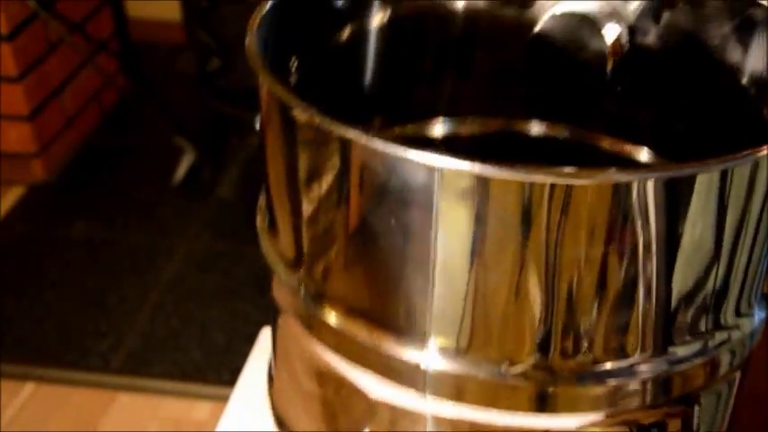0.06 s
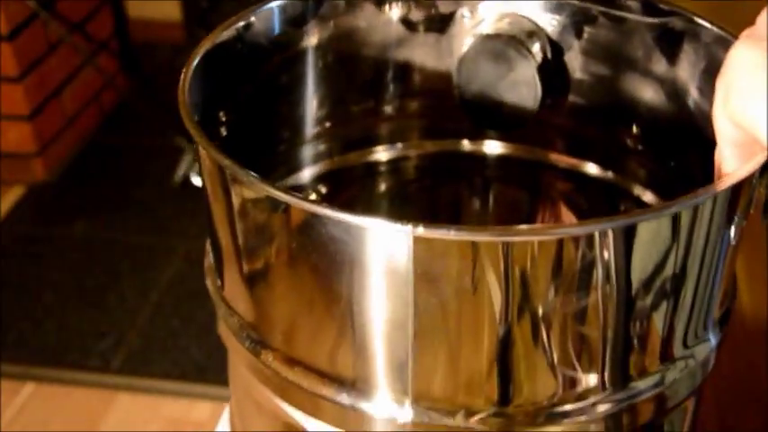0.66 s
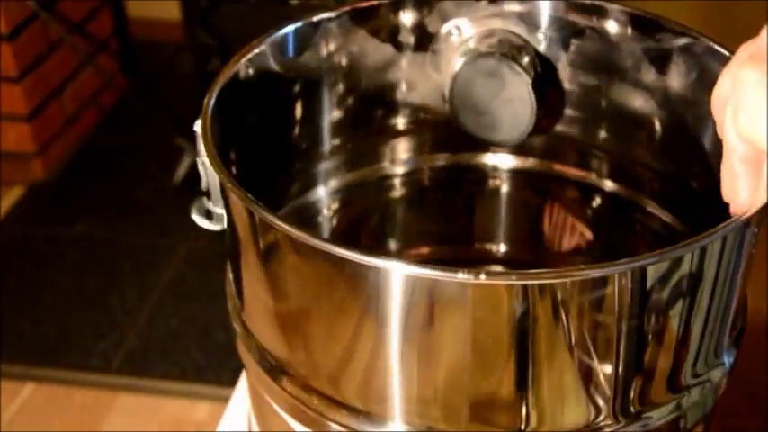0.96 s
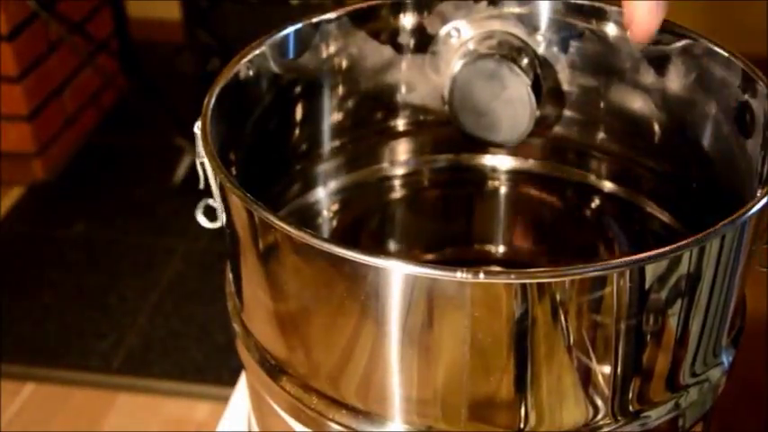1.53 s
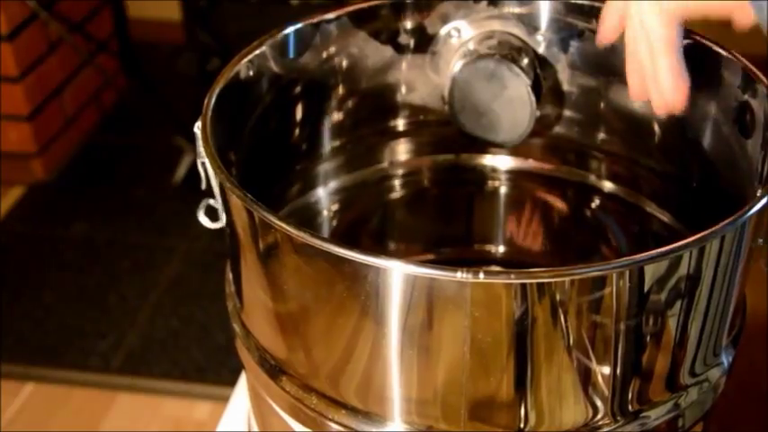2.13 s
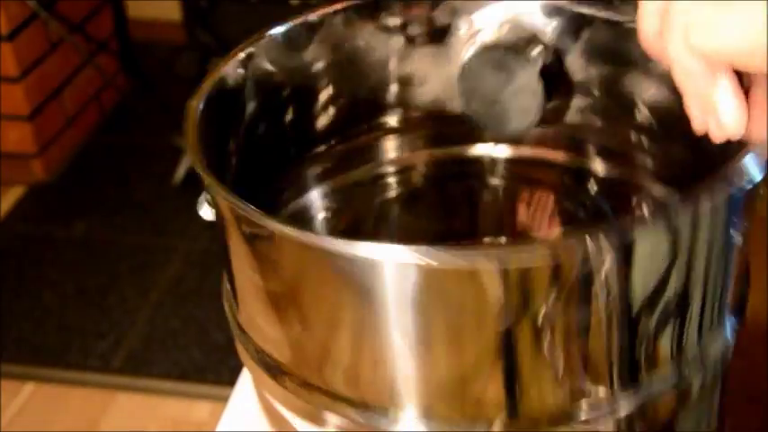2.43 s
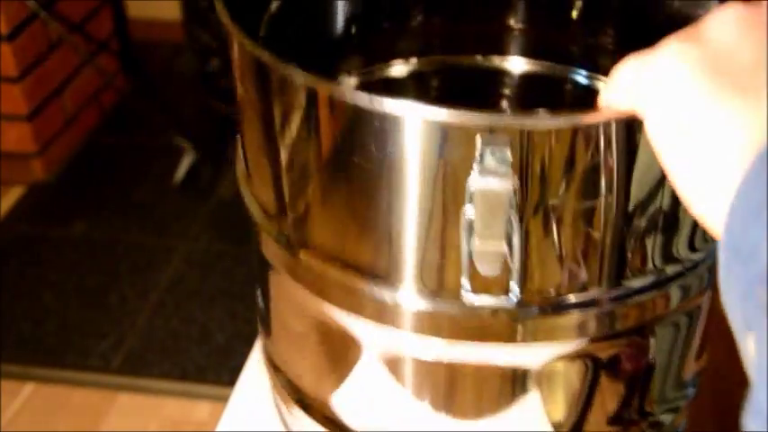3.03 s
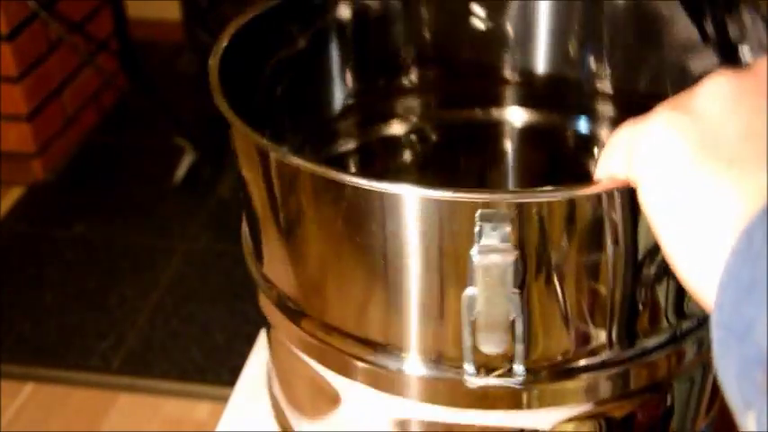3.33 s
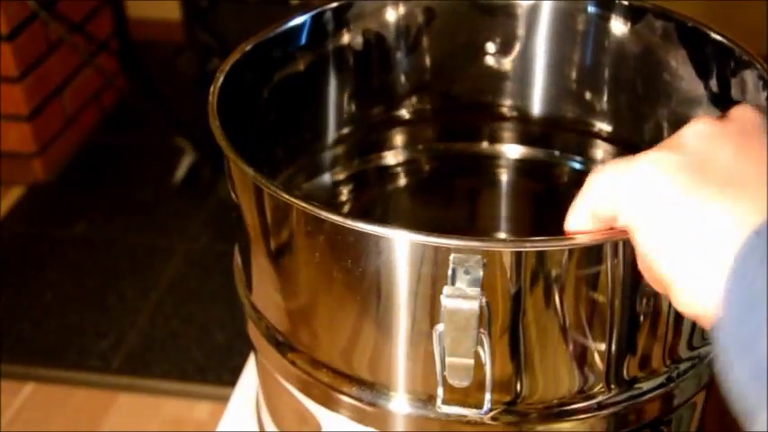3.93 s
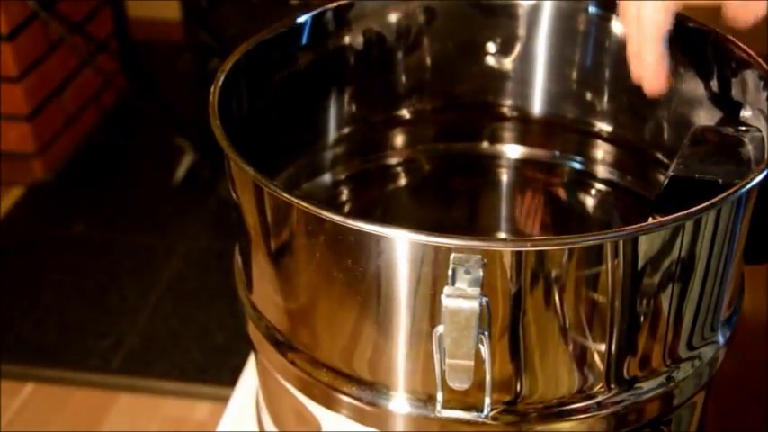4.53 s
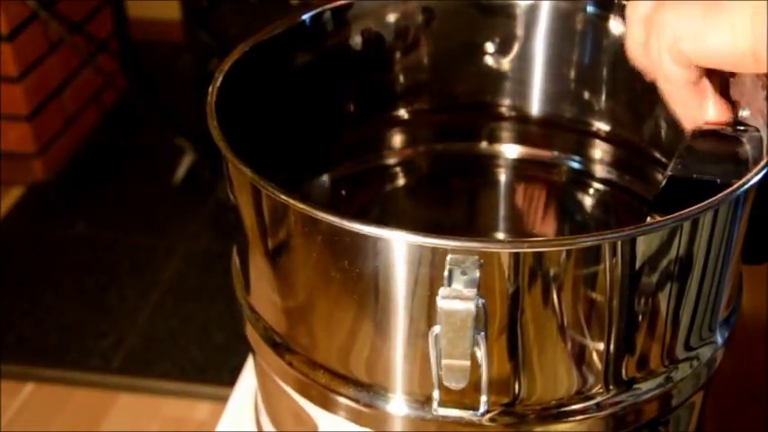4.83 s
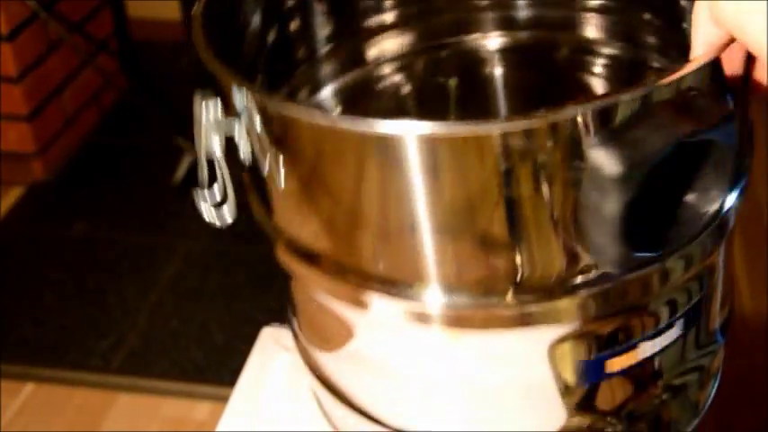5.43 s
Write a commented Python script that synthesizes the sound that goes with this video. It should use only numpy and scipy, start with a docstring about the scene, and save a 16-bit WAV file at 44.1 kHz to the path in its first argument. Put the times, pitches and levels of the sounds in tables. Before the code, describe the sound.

An empty stainless steel tank is handled close by in a quiet room with a short echo. It opens with a few light, ringing latch knocks on the thin wall and a sharper one at 0.7 seconds. From 0.9 to 1.3 seconds the tank lands with a hollow boom, a scrape and a dense clatter, leaving a faint hum. A lull follows, with a tap near 1.8 seconds and a hand sliding softly over steel. From 2.4 seconds the tank drags and the latches clank again, strongest near 3 seconds, where the wall briefly moans. A high clink and a soft thud come at 3.5 seconds, then another knock and weaker taps as the tank rocks until about 4.2. After a pause and another faint hand slide, a loud ringing clank just after 5 seconds starts a last scrape and latch chatter, lasting until about 5.6.

```python
"""An empty stainless steel tank is tipped, set down and turned by its rim in a quiet living room.
From the start it drags, its bottom drums, and loose latches knock on the thin wall, which rings.
Soon the rim sings and the bottom booms at a knock or a landing; after a second the tilted tank hums.
Then a hand slides over the steel. From about 2.5 s a latch's wire loop clinks and the rocking tank
moans now and then. Near the end the hand slides again, and a last move sets the latches chattering."""
import sys
import numpy as np
from scipy import signal
from scipy.fft import rfft, irfft
from scipy.io import wavfile
from scipy.ndimage import uniform_filter1d

SR = 44100
rng = np.random.default_rng(int(sys.argv[2]) if len(sys.argv) > 2 else 0)


def store_pcm(level_fs):
    """Save levels as 16-bit WAV."""
    pcm = np.round(np.clip(level_fs, -1, 1) * 32767).astype(np.int16)
    wavfile.write(sys.argv[1], SR, np.atleast_2d(pcm).T)


N = 250929
RING_TIME = np.arange(SR) / SR  # one second: the time axis of one ring

# how strongly the wall rings, from low to high: (frequency [Hz], level [dB])
WALL_SPECTRUM = [(60, -29), (250, -27.5), (650, -8), (900, -11.5), (1130, 1.5), (1420, -4.5), (1640, 4.5),
                 (1880, 2), (2350, -4), (3050, 0), (3480, -1), (4350, 0), (6900, -6.5), (7900, -14),
                 (9300, -6.5), (11500, -28)]
# each move of the tank: (start [s], length [s], drag level [dB], drumming level [dB])
MOVES = [(0, 0.014, -50, -54.5), (0.198, 0.14, -54, -72), (0.942, 0.3, -34.5, -59),
         (2.367, 0.15, -40, -55.5), (2.686, 0.069, -34.5, -58.5), (3.014, 0.22, -43, -63),
         (3.668, 0.54, -65, -64.5), (4.95, 0.23, -46.5, -59), (5.24, 0.48, -43.5, -63)]


def amp(db):
    """Turns decibels into a factor to multiply by."""
    return 10 ** (np.asarray(db) / 20)


def unit(x):
    """Scales a signal to an average size (rms) of 1."""
    return x / np.sqrt(np.mean(x ** 2) + 1e-20)


def read(points, hz):
    """Looks up a value between rows of (frequency [Hz], value), on a log-frequency axis."""
    f, value = np.transpose(points)
    return np.interp(np.log(hz + 1), np.log(f + 1), value)


def level(events, rise_s, sag_db_per_s, release_s):
    """Volume curve from (start [s], length [s], level [dB]): each event rises, drifts, then dies away."""
    power = np.zeros(N)
    for start, length, db in events:
        t = np.maximum(np.arange(N) / SR - start, 0)
        held = np.minimum(t / rise_s, 1) * amp(db - sag_db_per_s * np.minimum(t, length))
        power += (held * np.exp(-np.maximum(t - length, 0) / release_s)) ** 2
    return np.sqrt(power)


def add(mix, s, sound):
    """Mixes a sound in at s seconds."""
    part = mix[max(round(s * SR), 0):][:len(sound)]
    part += sound[:len(part)]


def waver(size):
    """A random wobble, smoothed over size samples."""
    return unit(uniform_filter1d(uniform_filter1d(rng.standard_normal(N), size), size))


def noise(spectrum, size):
    """Noise shaped by rows of (frequency [Hz], level [dB])."""
    gain = amp(read(spectrum, np.fft.rfftfreq(size, 1 / SR)))
    return unit(irfft(rfft(rng.standard_normal(size)) * gain, size))


def fading(spectrum, t60):
    """Noise whose bands each have their own fade time (t60: the time to fall by 60 dB)."""
    hz, t, bands = signal.stft(noise(spectrum, SR), SR, nperseg=256)
    fade = np.exp(-np.log(1000) * t / read(t60, hz)[:, None])
    return signal.istft(bands * fade, SR, nperseg=256)[1][:SR]


def resonate(x, hz, width_hz):
    """Keeps a narrow band of a sound, so that it rings."""
    return unit(signal.lfilter(*signal.iirpeak(hz, hz / width_hz, fs=SR), x))


def tones(modes, waver_hz, waver_db, size):
    """Held modes (an object's natural tones); each wobbles in level and pitch on its own."""
    out = np.zeros(N)
    for hz, db in modes:
        gain = amp(db + waver_db * waver(size))
        out += gain * np.sin(2 * np.pi * np.cumsum(hz + waver_hz * waver(size)) / SR)
    return out


def rings(modes, count, spread_db):
    """Rings of one object struck at count spots; each spot mixes the modes differently."""
    hz, db, t60 = np.transpose(modes).astype(np.float32)[:, :, None]
    t = RING_TIME.astype(np.float32)
    waves = np.sin(np.float32(2 * np.pi) * hz * t) * np.exp(np.float32(-np.log(1000)) * t / t60)
    size, sign = rng.standard_normal((count, 2, len(hz))).transpose(1, 0, 2)
    weight = amp(db.T + spread_db * np.clip(size, -2, 2)) * np.sign(sign)
    weight /= np.sqrt((weight ** 2).sum(1, keepdims=True) / 2)
    return weight.astype(np.float32) @ waves


def spot_colour(uneven_db=7.0, even_hz=6500):
    """The spectrum of one spot on the wall: it favours some groups of modes, less so in the treble."""
    hz = np.arange(60, 12000, 110)
    chance = np.clip(rng.standard_normal(len(hz)), -2, 2)
    favour_db = uneven_db * (chance - uniform_filter1d(chance, size=5)) / (1 + (hz / even_hz) ** 2)
    return np.transpose([hz, read(WALL_SPECTRUM, hz) + favour_db])


def wall(count, main_db=-3.0, crowd_db=-13, clash_db=-3):
    """The thin wall struck at count spots: main modes, a crowd of weak ones, and a noisy clash."""
    # the wall's main modes: (frequency [Hz], level [dB])
    main_modes = [(753, -18), (885, -13), (1012, -8), (1030, -8), (1094, -5), (1126, -2), (1176, -5),
                  (1215, -6), (1246, -7), (1312, -5), (1416, -11), (1580, -3), (1653, 3), (1698, -1),
                  (1787, -2), (1850, 2), (1898, -1), (1967, 0), (2066, -5), (2174, 0), (2549, -4),
                  (2600, -6), (2844, -4), (2914, -3), (3026, 0), (3108, -1), (4270, 0)]
    # how long they ring: (frequency [Hz], fade time [s])
    main_fades = [(600, 1), (1100, 0.62), (1700, 0.25), (2200, 0.36), (4000, 0.036)]
    # how long the crowd and the clash ring: (frequency [Hz], fade time [s])
    crowd_fades = [(200, 1), (1000, 0.71), (2000, 0.63), (4000, 0.31), (7000, 0.37), (11000, 0.21)]
    hz, db = np.transpose(main_modes)
    main = np.transpose([hz, db, read(main_fades, hz)])
    hz = np.linspace(900, 6000, 150) + rng.uniform(-17, 17, 150)
    crowd = np.transpose([hz, read(WALL_SPECTRUM, hz), read(crowd_fades, hz)])
    clash = np.array([fading(spot_colour(), crowd_fades) for _ in range(count)])
    return (amp(main_db) * rings(main, count, spread_db=2.8)
            + amp(crowd_db) * rings(crowd, count, spread_db=3.4) + amp(clash_db) * clash)


def hush(db=-61):
    """The room's faint, steady background noise."""
    # its tone colour: (frequency [Hz], level [dB])
    spectrum = [(15, -51), (25, -27.5), (233, -8.5), (907, -6.5), (1200, -5.5), (1370, -12.5), (2730, -12),
                (3110, -17), (4690, -18), (11500, -37.5), (22000, -120)]
    return amp(db) * noise(spectrum, N)


def drag(slips_per_s=40, size_db=7, drag_db=-1, low_hz=1600, soft_hz=5000):
    """Small uneven slips ring the wall at changing spots; light contact barely stirs the low modes."""
    out, spots = np.zeros(N), wall(count=6)
    drags = [(s, length, db) for s, length, db, _ in MOVES]
    force = level(drags, rise_s=0.083, sag_db_per_s=14.5, release_s=0.065)
    contact = signal.butter(1, [low_hz, soft_hz], "band", fs=SR)
    for ring in spots:
        slipping = rng.random(N) < slips_per_s / SR
        slips = slipping * amp(size_db * np.minimum(rng.exponential(1, N), 3))
        out += signal.oaconvolve(unit(slips) * force, unit(signal.lfilter(*contact, ring)))[:N]
    return amp(drag_db) * out / np.sqrt(len(spots) * SR)


def bottom():
    """Rubbing under the base makes the tank's bottom sound like a drum."""
    # the bottom's modes: (frequency [Hz], width [Hz], level [dB])
    drum_modes = [(122, 7.4, 0), (224.7, 9, 9.5), (261.3, 16, 10.5)]
    rub = noise([(40, -13), (110, 0.0), (280, 0.0), (600, -15), (2000, -64)], N)
    drum = sum(amp(db) * resonate(rub, hz, width) for hz, width, db in drum_modes)
    rubs = [(s, length, db) for s, length, _, db in MOVES]
    return unit(drum) * level(rubs, rise_s=0.091, sag_db_per_s=18, release_s=0.075)


def contacts(rebound, first_s=.004, last_s=.022):
    """A loose latch hits once, then bounces three times."""
    train = np.zeros(SR // 10)
    train[0] = 1
    for when, sign in zip(rng.random(3), rng.choice([-1, 1], 3)):
        add(train, first_s + (last_s - first_s) * when, [rebound * sign])
    return train / np.linalg.norm(train)


def knocks(knock_db=-6.5, crack_db=2, crack_s=0.023, snap_db=-1, snap_s=0.0025,
           treble_db=5, split_hz=3200, thin_hz=260):
    """Each latch knock snaps, cracks and rings the wall, with its own loudness and brightness."""
    # latches hit the wall: (time [s], level [dB], treble against that level [dB], bounce strength [ratio])
    hits = [(.008, -30, -10.5, 0.34), (0.191, -41, -25, 0.79), (0.325, -35, -26, 0.92),
            (.350, -31, -2, 0.16), (.698, -22.5, -5, 0.054), (0.819, -33, -12.5, 0.12),
            (0.9, -41.5, -1.5, 0.13), (.930, -27, -13, 0.16), (.962, -26.5, -3.5, 0.53),
            (.986, -23.5, -3.5, 0.39), (1.004, -18.5, -3, 0.095), (1.092, -24.5, -12, 0.7),
            (1.153, -22, -10.5, 0.85), (1.174, -30.5, -3.5, 0.74), (1.229, -27.5, -13, 0.25),
            (1.288, -35, -3.5, 0.3), (1.825, -30, -1, 0.22), (2.048, -41.5, -7, 0.5),
            (2.391, -32, -3.5, 0.16), (2.433, -26, -5.5, 0.48), (2.575, -29.5, -11, 0.7),
            (2.646, -30.5, -6.5, 0.31), (2.683, -33.5, -7.5, 0.32), (2.715, -25.5, -2.5, 0.64),
            (2.817, -42, -3, 0.37), (2.843, -38.5, -4, 0.23), (2.910, -23, -6.5, 0.58),
            (2.970, -21, -0.5, 0.2), (2.977, -23.5, -4, .15), (3.235, -25.5, -5, 0.42),
            (3.379, -36, -22, 0.37), (3.494, -22.5, -2, 0.15), (3.675, -34.5, -14.5, 0.27),
            (3.741, -26.5, -2, 0.17), (3.882, -44, -26, 0.26), (3.928, -40.5, -20, 0.19),
            (4.004, -43.5, -11, .7), (4.080, -39.5, -17.5, 0.25), (4.153, -39.5, -24, 0.45),
            (4.951, -43.5, -39, 0.75), (5.062, -20.5, -4, 0.28), (5.072, -23, -6.5, 0.34),
            (5.316, -29, -3.5, 0.51), (5.333, -29, -4.5, 0.28), (5.391, -32, -2.5, 0.35),
            (5.424, -33, -5.5, 0.18), (5.509, -45, 0, 0.18), (5.555, -32.5, -10, 0.84),
            (5.617, -32.5, -10, 0.13)]
    # the small latch's own snap: (frequency [Hz], level [dB])
    snap_spectrum = [(500, -35), (2500, -36), (4200, 32.5), (5800, 27), (8000, -38), (10000, 26),
                     (11500, -36)]
    out, low_pass = np.zeros(N), signal.butter(2, split_hz, fs=SR)
    for (s, db, bright_db, rebound), ring in zip(hits, wall(len(hits))):
        crack = amp(crack_db) * noise(spot_colour(), SR) * np.exp(-RING_TIME / crack_s)
        blow = signal.fftconvolve(ring + crack, contacts(rebound))
        snap = amp(snap_db) * noise(snap_spectrum, size=1024) * np.exp(-RING_TIME[:1024] / snap_s)
        add(blow, 0, snap)
        clang = signal.filtfilt(*low_pass, blow, padtype=None)
        treble = amp(bright_db + treble_db) * (blow - clang)
        add(out, s, amp(db + knock_db) * (clang + treble))
    return signal.lfilter(*signal.butter(2, thin_hz, "high", fs=SR), out)  # thin steel gives little bass


def rim(waver_db=2, twin_db=-8, twin_split=.012, rise_s=.018):
    """Some blows set single modes of the rim singing, wavering as the tank rocks."""
    # the rim's notes: (time [s], frequency [Hz], level [dB], fade time [s])
    notes = [(.351, 1864, -35.5, 0.41), (.351, 4270, -27, 0.076), (.698, 4290, -18.5, 0.083),
             (.698, 3060, -21, 0.12), (.698, 1177, -29, 0.14), (.819, 1670, -26.5, 0.092),
             (1.093, 2210, -23.5, 0.19), (1.16, 1655, -20.5, 0.12), (1.827, 1840, -39.5, 0.29),
             (2.049, 1916, -44.5, 0.3), (2.433, 2096, -25.5, 0.13), (2.716, 877, -42, 1.1),
             (2.971, 1025, -44.5, 1.9), (2.971, 1829, -19.5, 0.19), (3.237, 1043, -38, 1.24),
             (3.493, 1972, -24.5, 0.31), (3.493, 755, -38.5, 0.63), (3.741, 1655, -20, 0.12),
             (3.999, 1670, -33, 0.1), (4.078, 1677, -35, 0.14), (4.149, 1666, -40.5, .14),
             (5.062, 1570, -13.5, .081), (5.064, 1242, -23, 0.15), (5.085, 1053, -31, 0.11),
             (5.064, 2560, -27, 0.23)]
    out = np.zeros(N)
    for s, hz, db, t60 in notes:
        swell = (1 - np.exp(-RING_TIME / rise_s)) * np.exp(-np.log(1000) * RING_TIME / t60)
        # the rim is not quite round, so each note throbs against a slightly higher twin
        twin = amp(twin_db) * np.sin(2 * np.pi * (hz * (1 + twin_split) * RING_TIME + rng.random()))
        add(out, s, amp(db) * swell * (np.sin(2 * np.pi * hz * RING_TIME) + twin))
    return out * amp(waver_db * waver(size=700))


def booms(thud_db=-9.0, thud_s=0.036, tone_db=1, tone_s=0.016, rise_s=0.0095, low_hz=85):
    """The tank's bottom thuds and booms briefly when it lands or when the wall is knocked."""
    # the bottom booms: (time [s], level [dB], pitch [Hz])
    jolts = [(0.351, -50, 267), (0.701, -45, 265), (0.896, -27.5, 360), (0.903, -31, 133),
             (0.929, -17.5, 245), (0.929, -20, 131), (.963, -24.5, 267.6), (1.02, -37.5, 258),
             (1.158, -39, 250), (1.829, -45.5, 257), (2.407, -48.5, 144), (2.501, -37.5, 257),
             (3.521, -37, 255), (3.547, -44, 127), (3.665, -35, 343), (3.796, -39.5, 132),
             (3.833, -42, 269)]
    # the thud's tone colour: (frequency [Hz], level [dB])
    thud_spectrum = [(30, -19), (80, -12), (125, -5.5), (180, -16), (220, 1), (270, 6), (305, -12),
                     (450, -6.5), (650, -14), (850, 1.5), (1400, -39)]
    out = np.zeros(N)
    for s, db, hz in jolts:
        thud = amp(thud_db) * noise(thud_spectrum, SR) * np.exp(-RING_TIME / thud_s)
        boom = amp(tone_db) * np.sin(2 * np.pi * hz * RING_TIME) * np.exp(-RING_TIME / tone_s)
        add(out, s, amp(db) * (thud + boom) * (1 - np.exp(-RING_TIME / rise_s)))
    return signal.lfilter(*signal.butter(2, low_hz, "high", fs=SR), out)  # too small to push deep bass


def hollow_hum():
    """Tilted off its base, the empty tank hums freely in its deepest modes."""
    # the deep modes: (frequency [Hz], level [dB])
    deep_modes = [(123.8, -8), (204.6, -3), (247.6, 1), (602.9, -2)]
    # the tank is tilted: (start [s], length [s], level [dB])
    tilts = [(1.015, 0.19, -59.5), (2.71, 0.27, -61.5), (3.15, 0.62, -66), (5.35, 0.26, -59.5)]
    hum = tones(deep_modes, waver_hz=1.57, waver_db=2, size=2200)
    return hum * level(tilts, rise_s=0.012, sag_db_per_s=4, release_s=0.14)


def hand(ring_db=-5, grip_db=1.5, grain=.25):
    """Skin hisses on the steel in fine slips and stirs the wall's high modes as its grip wavers."""
    # the hiss of skin: (frequency [Hz], level [dB])
    skin_spectrum = [(100, -26), (500, -8), (1180, -12), (3000, -10), (6000, -8), (7900, -16),
                     (8770, -11.5), (10200, -16.5), (11500, -39), (22000, -120)]
    # the modes it stirs: (frequency [Hz], width [Hz])
    rubbed_modes = [(1670, 110), (3210, 45), (3930, 190), (4690, 64)]
    # the hand slides to find its grip: (start [s], length [s], level [dB])
    slides = [(1.64, 0.13, -68.5), (2.24, 0.11, -56.5), (4.675, 0.43, -62.5)]
    rub = noise(skin_spectrum, N) * (1 + grain * waver(size=120))
    ring = sum(resonate(rub, hz, width) for hz, width in rubbed_modes)
    volume = level(slides, rise_s=0.042, sag_db_per_s=-5, release_s=0.22)  # each slide grows louder
    return (rub + amp(ring_db) * unit(ring)) * volume * amp(grip_db * waver(size=900))


def clinks(centre_hz=5450, width_hz=650, ring_s=0.0085):
    """A latch's wire loop flips against its lever with a short, high clink."""
    # the loop flips: (time [s], level [dB])
    flips = [(2.576, -41), (2.687, -38), (2.714, -30), (3.493, -21.5)]
    out = np.zeros(N)
    for s, db in flips:
        ring = resonate(rng.standard_normal(SR), centre_hz, width_hz)
        ring = resonate(ring, centre_hz, width_hz)  # twice, for a purer note
        add(out, s, amp(db) * ring * np.exp(-RING_TIME / ring_s))
    return out


def moan(grit=0.29):
    """Rocking feeds several wall modes and bends them; the grating contact makes them rough."""
    # the moaning modes: (frequency [Hz], level [dB])
    moan_modes = [(752, 0), (886, -12), (1126, -8), (1312, -9), (2175, -6)]
    # the tank rocks on its base: (start [s], length [s], level [dB])
    rocks = [(2.70, 0.023, -41.5), (2.96, 0.014, -31.5), (3.64, 0.16, -53.5), (3.885, 0.085, -52.5),
             (4.01, 0.064, -51.5), (4.06, 0.074, -51), (4.18, 0.032, -48.5), (5.32, 0.34, -50.5)]
    voice = tones(moan_modes, waver_hz=5, waver_db=2, size=500) * (1 + grit * waver(size=130))
    return voice * level(rocks, rise_s=.025, sag_db_per_s=3, release_s=.03)


def room(x, wet_db, build_s=0.0014):
    """Adds a short, blurred echo from the room's walls and floor."""
    # how long the echo lasts: (frequency [Hz], fade time [s])
    echo_fades = [(100, 0.52), (1000, 0.21), (4000, 0.4), (11000, 0.46)]
    tail = fading([(20, 0), (20000, 0)], echo_fades) * (1 - np.exp(-RING_TIME / build_s))
    return x + amp(wet_db) * signal.oaconvolve(x, tail / np.linalg.norm(tail))[:N]


def scene():
    """The tank and the hand in a quiet room."""
    metal = room(knocks() + clinks() + drag() + hand(), wet_db=-14.0) + rim() + moan()
    base = room(booms(), wet_db=-12.5) + bottom() + hollow_hum()
    return (metal + base + hush())[None]


def record(dry):
    """Cuts away the highest treble."""
    edge_hz = 11500
    low_pass = signal.firwin(255, edge_hz, window=("kaiser", 8), fs=SR)
    return signal.oaconvolve(dry, low_pass[None], "same")


dry = scene()
out = record(dry)
store_pcm(out)
```